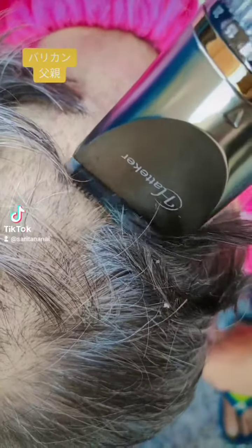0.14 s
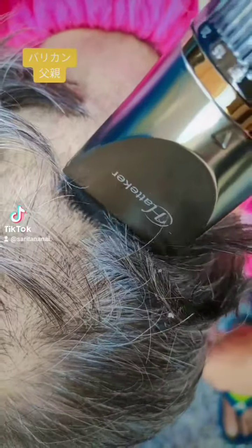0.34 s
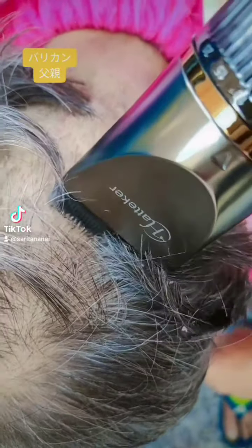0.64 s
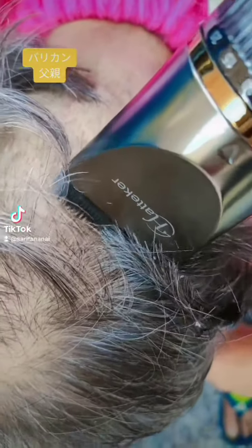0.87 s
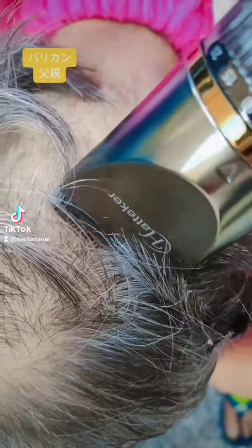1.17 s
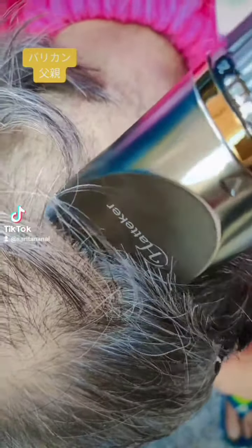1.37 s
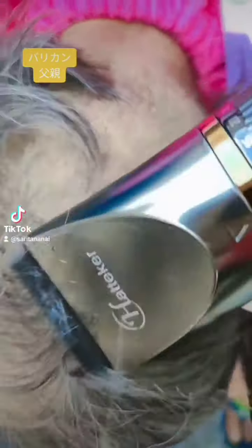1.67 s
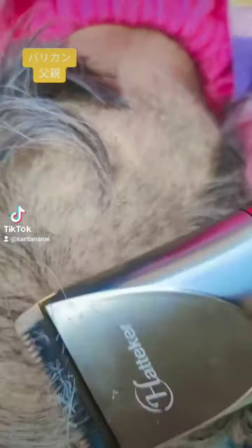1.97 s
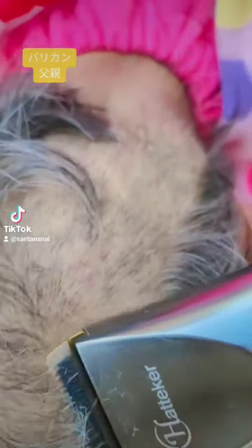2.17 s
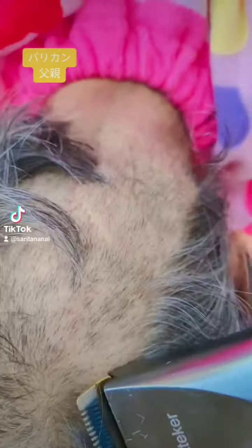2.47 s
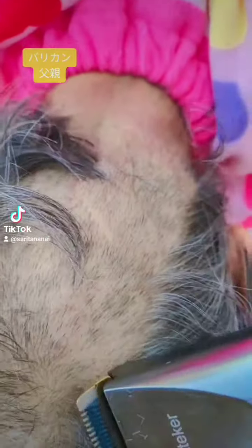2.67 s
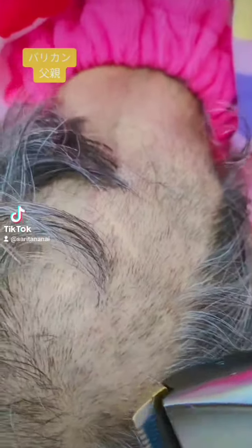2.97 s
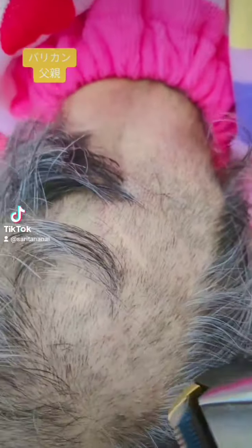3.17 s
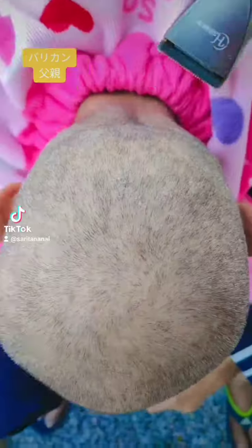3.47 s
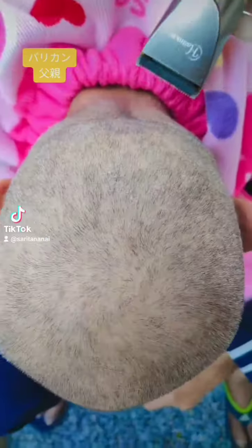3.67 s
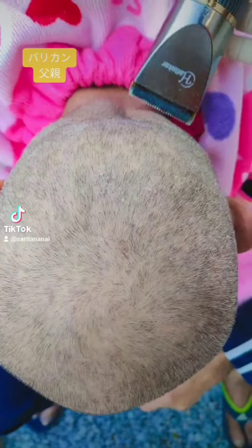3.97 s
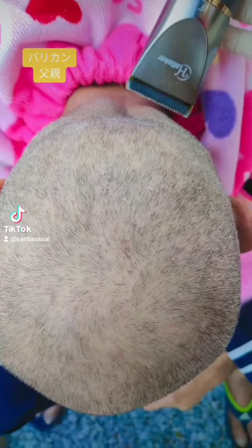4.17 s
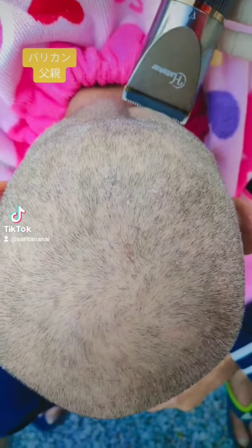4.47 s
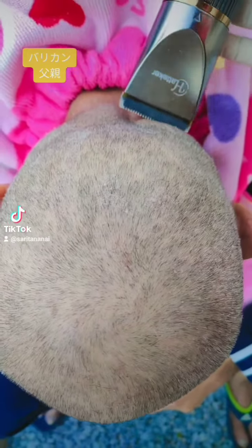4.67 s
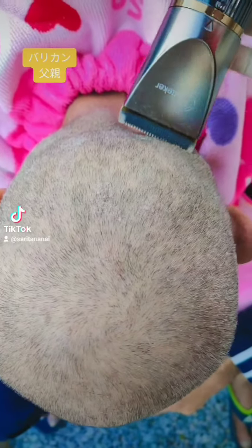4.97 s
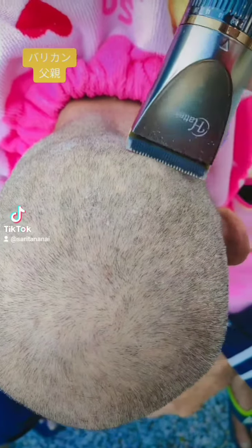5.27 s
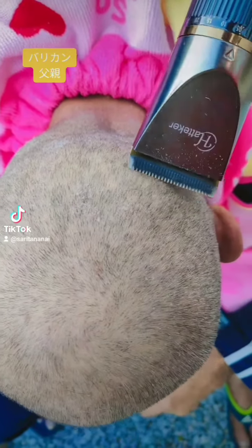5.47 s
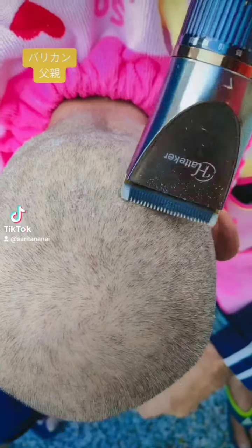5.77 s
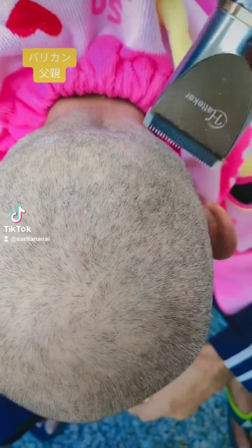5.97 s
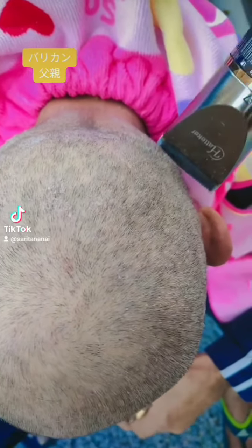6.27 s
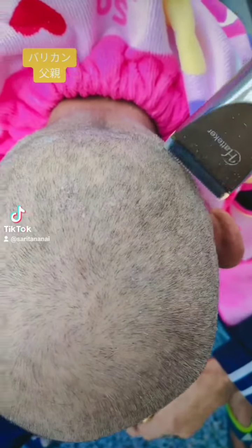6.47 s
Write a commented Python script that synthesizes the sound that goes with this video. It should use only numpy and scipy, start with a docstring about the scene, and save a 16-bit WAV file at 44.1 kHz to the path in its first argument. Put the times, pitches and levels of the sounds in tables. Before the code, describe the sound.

Hair clippers buzz steadily close by, wind thumps the microphone, then after a brief silence a switch clicks and the motor spins up again.

```python
"""Hair clippers buzz close to a phone outdoors: a motor rocks the blade once per turn, so a harmonic series sounds.
Wind thumps follow; after a short silence the wind goes on alone, a hand clicks the switch and the motor spins up.
The buzz sums shaft orders (multiples of the turning rate) into one waveform per turn; scraping hair is pulsed noise.
Wind is lumpy low noise with single pressure pulses, the switch is decaying noise bursts, far traffic is steady noise."""
import sys
import numpy as np
from scipy import signal
from scipy.fft import rfft, irfft, next_fast_len
from scipy.io import wavfile
from scipy.ndimage import map_coordinates

SR = 44100
rng = np.random.default_rng(int(sys.argv[2]) if len(sys.argv) > 2 else 0)


def store_wav(level_fs):
    """Save 16-bit WAV to argv[1]."""
    pcm = np.round(np.clip(np.atleast_2d(level_fs), -1, 1) * 32767)
    wavfile.write(sys.argv[1], SR, pcm.T.astype(np.int16))


N = 291933
TIME = np.arange(N) / SR  # s

# Two passages meet inside a silence.
JOIN_S = 3.455
SILENCE_S = (3.397, 3.508)  # fade-out starts, fade-in starts
TOP_HZ = 14300  # band limit of the whole sound

# Poses 0-3: blade in hair, turned away; then farther off: at the neck, upright.
# Shaft orders before the hold levels: (order [1], then left level [dB], right level [dB] for each pose)
ORDER_LEVELS = [(9, -54, -45, -52, -50, -63, -60, -60, -60), (11, -71, -46, -56, -52, -63, -62, -66, -60),
                (12, -57, -56, -54, -57, -64, -66, -62, -65), (13, -57, -56, -51, -50, -53, -56, -49, -52),
                (14, -57, -51, -51, -52, -65, -57, -61, -68),
                (15, -52, -46, -52, -55, -59, -49.5, -64, -52),
                (17, -63, -53, -57, -55, -64, -61, -65, -60), (18, -59, -50, -65, -56, -69, -67, -66, -70),
                (19, -54, -47, -52, -55, -59, -54, -57, -50), (20, -59, -56, -54, -54, -58, -54, -57, -52),
                (21, -56, -52, -61, -54, -60, -57, -51, -48), (22, -53, -49, -53, -53, -56, -48, -59, -50),
                (23, -50, -51, -53, -48, -60, -51, -55, -47), (24, -42, -40, -43, -46, -58, -51, -55, -44),
                (25, -44, -43, -43, -42, -65, -59, -58, -46), (26, -51, -49, -48, -52, -57, -49, -60, -52),
                (27, -57, -53, -55, -51, -59, -58, -52, -48), (28, -55, -47, -56, -55, -65, -72, -54, -50),
                (29, -53, -51, -51, -52, -57, -53, -58, -53), (30, -55, -50, -62, -68, -71, -55, -58, -58),
                (31, -54, -58, -51, -55, -61, -53, -62, -51), (32, -66, -50, -64, -56, -67, -60, -60, -56),
                (33, -52, -56, -54, -53, -66, -65, -63, -57), (34, -68, -54, -70, -66, -63, -54, -60, -53),
                (35, -65, -54, -61, -55, -74, -62, -67, -60), (38, -60, -53, -64, -60, -60, -58, -73, -65),
                (39, -58, -53, -54, -65, -60, -58, -61, -55)]
# Upper orders coloured by the blade's ring, before random spread: (order [1], level [dB])
UPPER_LEVELS = [(37, -62), (42, -66), (47, -62), (50, -64), (55, -59.5), (61, -69), (80, -69), (95, -72),
                (106, -76), (150, -78), (215, -79)]
# Full width of the random phase departure from one clean blow per turn, before smearing: (order [1], width [turns])
PHASE_STRAY = [(9, .5), (22, .25), (30, .25), (64, .6), (215, .8)]
# How the clippers are held; rasp and hiss levels precede the stroke pulse, the others are gains:
# (time [s], pose [0-3], case gain [dB], upper-order gain [dB], blade-mode gain [dB], rasp level [dB], hiss level [dB])
HOLD = [(0, 0, -.5, 0, 1, -47.5, -58.5), (1.42, 0, .5, .5, 1, -47.5, -57.5),
        (1.57, .2, 1, 1.5, 0, -40.5, -57), (1.74, .3, .5, 1, 0, -48, -64), (2.4, 1, 0, .5, 1, -51, -71),
        (3.45, 1, -.5, 0, 1, -51.5, -67.5), (4.19, 2, -12, -15, -3, -57, -69),
        (4.245, 2, -3, -9, -2, -50, -65), (4.45, 2, -.5, -6, -3, -54.5, -61.5),
        (5, 2.05, 0, -4.5, -3, -54, -59.5), (5.45, 3, -2, -4, 4, -54.5, -62.5),
        (5.85, 3, 0, -3, 1, -52.5, -62.5), (6.2, 3, -1.5, -6, -3, -54, -64),
        (6.62, 3, -1, -5, -3, -53.5, -63)]
# Relative spectra of scraping rasp and treble hiss: (frequency [Hz], density [dB per Hz])
RASP_SPECTRUM = [(300, -21), (500, -7), (1100, -8.5), (1650, 0), (2400, -7.5), (3500, -6.5), (4500, -11),
                 (6700, -13), (7600, -18.5), (12000, -19), (14500, -28)]
HISS_SPECTRUM = [(4500, -24), (9500, -5), (13000, 0), (14500, -2)]
# Thin blade tone that comes forward as the clippers turn aside at the end: (time [s], level before wobble [dB])
WHINE_LEVEL = [(5.5, -70), (5.95, -56), (6.62, -57)]
# Left-port buzz level dips, then rises, as the clippers move: (time [s], gain [dB])
LEFT_BUZZ_GAIN = [(5.2, 0), (5.55, -3.5), (5.9, -3.5), (6.2, 2)]
# The phone body shifts left phase against right beyond plain delay, one list per passage: (order [1], shift [turns])
BODY_SHADOW = [
    [(9, -.13), (11, -.06), (15, -.33), (18, .17), (22, .24), (27, 0), (30, .12), (32, -.16), (41, -.55),
     (44, -.9), (56, -1.38)],
    [(9, .12), (11, .33), (12, -.09), (13, -.14), (14, -.58), (15, -.5), (17, .02), (27, .08), (41, .1),
     (50, -.1), (56, -.04)],
]
# Hair and distance blur the blows, one entry per pose: (stray factor [1])
STRAY_FACTOR = (1.35, 1, 2, 1.4)
# How much sooner the left port hears the blade, one entry per pose: (lead [ms])
LEFT_LEAD_MS = (.31, .56, -.31, -.31)
# Upper orders, left minus right, one entry per pose: (difference [dB])
UPPER_PAN_DB = (-1, 4, -1, -3)
# Speed missing at switch-on, dying away exponentially: (gap [turns per s], time constant [s])
SPIN_UP = [(19.4, .058), (.7, .5)]

START_SPEED, SAG_PER_S = 66.83, .055  # first passage: turns per s, and their loss each second
SWITCH_S, TOP_SPEED, SWELL_S = 4.18, 65.1, .02  # second: switch-on s, final turns per s, swell time constant s
SHAFT_START = (-.13, .36)  # shaft angle offset per passage, turns
CASE_FROM = 19  # lower orders are motor tones gliding with the shaft, higher ones ring in case and blade
HUM_LAG_TURNS = (.05, .22)  # motor-tone lag per passage, turns
BLADE_MODE_ORDERS, BLADE_MODE_DB = (48, 49), -59  # the blade's strongest mode, before its gain
WHINE_ORDER = 42
CLICK_LAG_TURNS = .04  # orders above the case mode follow the blow
RETURN_TURNS, RETURN_ORDERS = .57, (30, 37)  # these orders ring on the return stroke, this much later
UPRIGHT_TURNS, UPRIGHT_ORDERS = .55, (20, 25)  # upright, the case mode reaches both ports in step
FAR_FROM, FAR_DB = 62, -3  # farther off, orders above this one are weaker
FREE_RING_S = .05  # time constant of the spin-up stage in which blows ring separately
RASP_PAN_DB = (1.2, 2.5)  # half of right minus left, per passage

# Switch clicks: (time [s], level before band filter and decay [dB], centre [Hz], left minus right [dB])
SWITCH_CLICKS = [(3.8846, -37.5, 3190, -4.5), (3.9569, -53, 5000, -8), (4.0198, -40.5, 1250, -7),
                 (4.0677, -42, 3060, -2.5)]
# Relative spectrum of the thumb on the case: (frequency [Hz], density [dB per Hz])
RUB_SPECTRUM = [(800, -33.5), (2500, -2), (5000, 4), (8000, -16.5), (12000, -31.5)]
CLICK_T60, CASE_T60 = .008, .04  # s to fall 60 dB
RUB_FROM_S, RUB_PEAK_S, RUB_DB = 4.035, 4.07, -62  # level at the peak, before its wobble
RUB_RISE_DB_PER_S, RUB_FALL_DB_PER_S = 60, 220

# Relative spectra of low buffeting and higher flutter: (frequency [Hz], density [dB per Hz])
BUFFET_SPECTRUM = [(6, -33), (12, -3), (40, 1), (90, -4.5), (130, -13.5), (250, -56)]
FLUTTER_SPECTRUM = [(60, -35), (110, -2.5), (180, -8.5), (270, -19), (450, -31), (900, -68)]
# Steady buffeting on the ports: (time [s], left level [dB], right level [dB])
BREEZE = [(0, -44, -45), (2.5, -44, -43), (3.45, -42, -38), (3.46, -35, -39), (4.0, -35, -39),
          (4.45, -34, -30), (4.7, -38, -37), (5.3, -34, -36), (5.55, -46, -36), (6.0, -43, -33),
          (6.3, -40, -40), (6.62, -38, -39)]
# Single wind pushes: (time [s], peak on the nearer port [dB], left minus right [dB], nominal width [ms])
THUMPS = [(2.593, -18.0, -20.0, 3.8), (2.618, -14.0, -22.0, 2.5), (2.665, -13.0, -22.0, 2.9),
          (2.684, -15.0, -20.0, 4.7), (2.78, -24.0, -13.0, 5.7), (3.066, -14.0, -26.0, 4.7),
          (3.088, -17.0, -22.0, 2.4), (3.108, -19.0, -22.0, 5.5), (3.653, -20.0, 18.0, 3.4),
          (3.734, -22.0, 13.0, 2.6), (4.089, -19.0, -8.0, 5.3), (4.248, -20.0, -3.0, 3.6),
          (4.433, -19.0, -3.0, 6.1), (4.496, -20.0, -8.0, 3.1), (4.89, -19.0, 0.0, 4.3),
          (4.991, -21.0, 10.0, 4.4), (5.214, -19.0, -5.0, 3.6), (5.309, -21.0, 8.0, 3.4),
          (5.418, -22.0, 15.0, 3.0), (5.591, -17.0, -29.0, 4.1), (5.725, -22.0, -13.0, 3.6),
          (5.808, -18.0, -14.0, 5.2), (5.875, -19.0, -23.0, 6.3), (6.118, -24.0, 11.0, 2.2),
          (6.141, -26.0, 11.0, 2.0), (6.171, -25.0, 11.0, 1.5), (6.321, -18.0, 19.0, 1.5),
          (6.388, -23.0, 20.0, 1.6), (6.432, -21.0, 3.0, 5.0)]
FLUTTER_DB = (-3, -15)  # relative to the buffeting, per passage
WAKE_DB, WAKE_RISE_S, WAKE_FALL_S = -16, .011, .021  # turbulence around each thump
SHARP_MS = 1.8  # thumps this narrow flutter as strongly as they rumble

# Relative spectrum of far traffic and air: (frequency [Hz], density [dB per Hz])
STREET_SPECTRUM = [(20, -25.5), (60, -10), (130, -3.5), (300, -11.5), (600, -15), (3000, -30), (8000, -54),
                   (14500, -55)]
STREET_DB = (-51, -59)  # mean level per passage


def clippers():
    """Periodic excitation: each turn repeats a buzz whose orders, delays and port differences depend on pose."""
    pose, case_db, upper_db, mode_db, rasp_db, hiss_db = curves(HOLD)
    speed = shaft_speed()
    since = np.maximum(TIME - SWITCH_S, 0)
    angle = np.cumsum(speed) / SR + by_passage(SHAFT_START) + .0004 * wobble(30)
    lead_ms = np.interp(pose, np.arange(len(LEFT_LEAD_MS)), LEFT_LEAD_MS)
    place = (angle + np.array([[.5], [-.5]]) * lead_ms * speed / 1000) % 1
    free_ring = by_passage((1, 1 + SPIN_UP[0][0] * np.exp(-since / FREE_RING_S) / speed))
    glide = np.ones(N)

    order = np.arange(216)
    turns = blow_phase(order)
    stray = along(PHASE_STRAY, order) * rng.uniform(-.5, .5, len(order))
    # random phase scatter, growing with order, makes the ports less alike
    port_scatter = .022 * (order / 24) ** 1.5 * rng.standard_normal((2, len(order)))

    buzz = np.zeros((2, N))
    for p in range(len(LEFT_LEAD_MS)):
        share = np.clip(1 - abs(np.clip(pose, 0, len(LEFT_LEAD_MS) - 1) - p), 0, 1)
        on = share > 0
        for port in range(2):
            phase = turns + STRAY_FACTOR[p] * stray + port_scatter[port] + port_phase(order, p, port)
            hum, body, blade, mode = pose_waveforms(order, phase, p, port)
            parts = [(case_db, hum, glide), (case_db, body, free_ring),
                     (upper_db, blade, free_ring), (mode_db, mode, free_ring)]
            for gain_db, turn, stretch in parts:
                buzz[port, on] += share[on] * amp(gain_db[on]) * blows(turn, place[port, on], stretch[on])

    whine = np.sqrt(2) * np.sin(2 * np.pi * WHINE_ORDER * place)
    buzz += amp(curves(WHINE_LEVEL)[0]) * whine * (TIME > JOIN_S)
    buzz[0] *= amp(curves(LEFT_BUZZ_GAIN)[0])
    buzz *= amp(.6 * wobble(60) + .3 * wobble(5))  # no two strokes are quite alike
    running = by_passage((1, 1 - np.exp(-since / SWELL_S)))
    return running * (buzz + scraping(angle, rasp_db, hiss_db))


def shaft_speed():
    """Motor dynamics, in turns per second: a slow linear sag, then an exponential approach to final speed."""
    since = np.maximum(TIME - SWITCH_S, 0)
    missing = sum(gap * np.exp(-since / tau) for gap, tau in SPIN_UP)
    return by_passage((START_SPEED - SAG_PER_S * TIME, TOP_SPEED - missing))


def blow_phase(order):
    """Resonance phase: the case mode near order 24 lags and rings after the blow; returns in turns."""
    ring = -np.arctan((order - 24.8) / 1.4) / (2 * np.pi)
    on_return = within(order, RETURN_ORDERS)
    return .62 * ring - RETURN_TURNS * order * on_return - CLICK_LAG_TURNS * np.maximum(order - 24, 0)


def port_phase(order, p, port):
    """Diffraction and lag: the phone body shifts the left port's phase, and motor tones trail; in turns."""
    upright = p == len(STRAY_FACTOR) - 1
    left = 1 - port
    shift = left * along(BODY_SHADOW[p // 2], order)
    shift += left * upright * UPRIGHT_TURNS * within(order, UPRIGHT_ORDERS)
    return shift - HUM_LAG_TURNS[p // 2] * np.minimum(order - CASE_FROM, 0)


def pose_waveforms(order, phase, p, port):
    """Fourier synthesis of one turn at one port: motor hum, case body, upper blade orders and blade mode."""
    table, mode = np.array(ORDER_LEVELS), np.array(BLADE_MODE_ORDERS)
    low = table[:, 0].astype(int)
    high = np.setdiff1d(order[36:], np.r_[low, mode])
    low_db = table[:, 1 + 2 * p + port]
    motor = low < CASE_FROM
    tilt_db = (.5 - port) * UPPER_PAN_DB[p] + FAR_DB * (p // 2) * (high > FAR_FROM)
    high_db = along(UPPER_LEVELS, high) + tilt_db + rng.normal(-1, 3.5, len(high))
    hum = one_turn(low[motor], low_db[motor], phase[low[motor]])
    body = one_turn(low[~motor], low_db[~motor], phase[low[~motor]])
    blade = one_turn(high, high_db, phase[high])
    return hum, body, blade, one_turn(mode, BLADE_MODE_DB, phase[mode])


def one_turn(orders, db, turns, size=8192):
    """Inverse Fourier series: orders of given rms level and phase sum to the waveform of one shaft turn."""
    z = np.zeros(size // 2 + 1, complex)
    z[orders] = amp(db) * np.exp(2j * np.pi * turns) * size / np.sqrt(2)
    return irfft(z, size)


def blows(turn, place, stretch):
    """Free vibration: on a slow shaft blows come later but the case rings at its own pitch."""
    def read(u):
        return np.interp(u * stretch % 1 * len(turn), np.arange(len(turn) + 1), np.append(turn, turn[0]))

    fade = np.cos(np.pi * place / 2) ** 2  # crossfade this blow with the next
    return fade * read(place) + (1 - fade) * read(place - 1)


def scraping(angle, rasp_db, hiss_db):
    """Amplitude-modulated friction noise: blades scrape twice per turn, hardest just after each blow."""
    decay = np.exp(-(2 * angle % 1) / .3)
    stroke = .7 + decay * (1 + .3 * np.cos(2 * np.pi * angle))
    rasp = amp(rasp_db + 1.2 * wobble(20) + 2.1 * wobble(400)) * noise(RASP_SPECTRUM, .3)
    hiss = amp(hiss_db + 2.5 * wobble(16)) * noise(HISS_SPECTRUM, .3)
    return stroke * (rasp + hiss) * amp(by_passage(RASP_PAN_DB) * [[-1], [1]])


def fingers():
    """Impact and friction: clicks are damped band noise, and a thumb slides to the switch as shaped noise."""
    clicks, t = np.zeros((2, N + SR)), np.arange(SR // 10) / SR
    decay = amp(-60 * t / CLICK_T60) + .2 * amp(-60 * t / CASE_T60)
    for s, db, hz, pan_db in SWITCH_CLICKS:
        band = signal.butter(1, [hz / 2.5, min(hz * 2.5, 15000)], "band", fs=SR)
        tick = signal.lfilter(*band, rng.standard_normal((2, len(t)))) * decay
        start = round(s * SR)
        clicks[:, start:start + len(t)] += amp(db + np.array([[.5], [-.5]]) * pan_db) * tick
    from_peak = TIME - RUB_PEAK_S
    rub_db = RUB_DB - np.where(from_peak < 0, -RUB_RISE_DB_PER_S * from_peak, RUB_FALL_DB_PER_S * from_peak)
    rub = (TIME > RUB_FROM_S) * amp(rub_db + 3 * wobble(150)) * noise(RUB_SPECTRUM, .2)
    return clicks[:, :N] + rub


def wind():
    """Turbulent pressure: lumpy noise almost independent at each port, with higher flutter and single pushes."""
    push, wake, sharp = thumps()
    lumps = amp(by_passage((1.5, 3.2)) * np.array([wobble(18), wobble(18)]))
    buffet = unit(lumps * noise(BUFFET_SPECTRUM, .1))
    flutter = unit(lumps ** 1.5 * noise(FLUTTER_SPECTRUM, .1))
    steady = amp(curves(BREEZE)) * (buffet + amp(by_passage(FLUTTER_DB)) * flutter)
    return steady + wake * buffet + sharp * flutter + push


def thumps():
    """Pressure pulses on the membrane, each within a swell of turbulence; narrow ones flutter more."""
    push, wake, sharp = np.zeros((3, 2, N))
    signs = rng.choice([-1, 1], (len(THUMPS), 2, 1))
    for (s, db, pan_db, ms), sign in zip(THUMPS, signs):
        near = slice(max(round((s - .1) * SR), 0), round((s + .3) * SR))
        gain, since = amp(db + np.minimum([[pan_db], [-pan_db]], 0)), TIME[near] - s
        u = since / (.00062 * ms)  # the Gaussian's deviation is 0.62 of the nominal width
        push[:, near] += gain * sign * (1 - .6 * u * u) * np.exp(-u * u / 2)
        swirl = amp(WAKE_DB) * gain * np.exp(-np.where(since < 0, -since / WAKE_RISE_S, since / WAKE_FALL_S))
        wake[:, near] += swirl
        sharp[:, near] += swirl * min(SHARP_MS / ms, 1) ** 2
    return push, wake, sharp


def street():
    """Superposition of far sources: traffic and air merge into partly correlated, slowly wavering noise."""
    return amp(by_passage(STREET_DB) + wobble(3)) * noise(STREET_SPECTRUM, .5)


def noise(spectrum, alike):
    """Partial coherence: stereo noise of rms 1 whose ports share the power fraction alike."""
    common, left, right = rng.standard_normal((3, N))
    pair = np.sqrt(alike) * common + np.sqrt(1 - alike) * np.array([left, right])
    return unit(filtered(pair, lambda hz: amp(along(spectrum, hz))))


def filtered(x, gain):
    """Linear filtering: the spectrum is multiplied by a gain that depends on frequency."""
    m = next_fast_len(N + SR // 2)
    return irfft(rfft(x, m) * gain(np.fft.rfftfreq(m, 1 / SR)), m)[..., :N]


def wobble(rate):
    """Band-limited fluctuation: a smooth random curve with rate knots a second."""
    return map_coordinates(rng.standard_normal(int(N * rate / SR) + 4), [np.arange(N) * rate / SR])


def amp(db):
    """Decibel law: level to amplitude."""
    return 10 ** (np.asarray(db) / 20)


def unit(x):
    """Normalisation to rms 1."""
    return x / np.sqrt(np.mean(x ** 2, axis=-1, keepdims=True) + 1e-20)


def along(points, at):
    """Logarithmic interpolation of (x, value) points."""
    x, v = np.transpose(points)
    return np.interp(np.log(at + 1), np.log(x + 1), v)


def curves(rows):
    """Linear interpolation in time: one value per sample for each column after the time."""
    s, *cols = np.transpose(rows)
    return [np.interp(TIME, s, c) for c in cols]


def by_passage(pair):
    """Piecewise choice: the first value before the join, the second after."""
    return np.where(TIME < JOIN_S, *pair)


def within(order, limits):
    """Band selection: true for orders from the lower to the upper limit."""
    return (order >= limits[0]) & (order <= limits[1])


def scene():
    """Superposition of all sources at the two ports."""
    return clippers() + fingers() + wind() + street()


def record(dry):
    """Gating and band limiting: a silence joins two passages and nothing is kept from the band limit up."""
    fade_out = (SILENCE_S[0] - TIME) / .004 + 1
    fade_in = (TIME - SILENCE_S[1]) / .009
    keep = np.clip(np.maximum(fade_out, fade_in), 0, 1)
    return filtered(dry * keep, lambda hz: hz < TOP_HZ)


dry = scene()
out = record(dry)
store_wav(out)
```